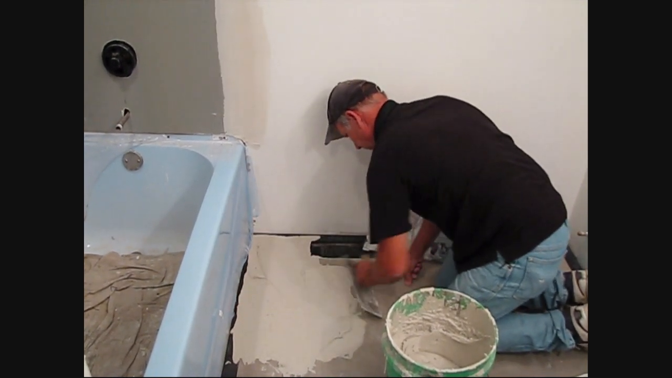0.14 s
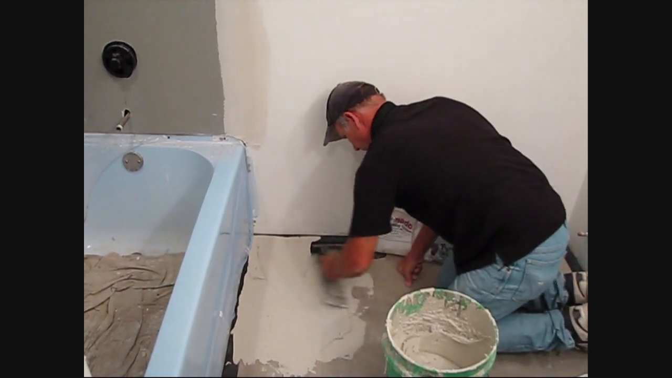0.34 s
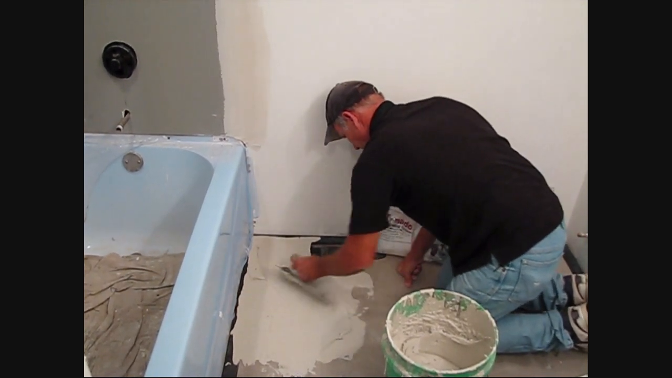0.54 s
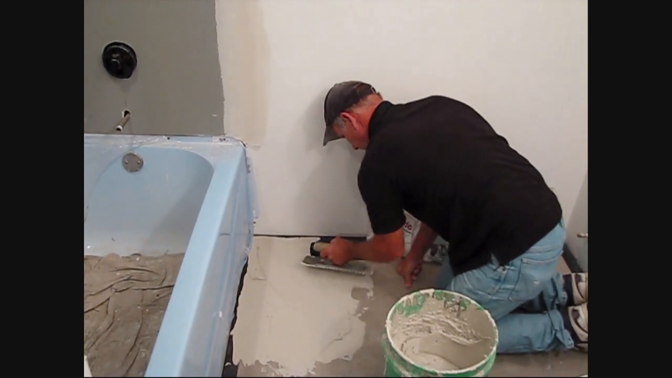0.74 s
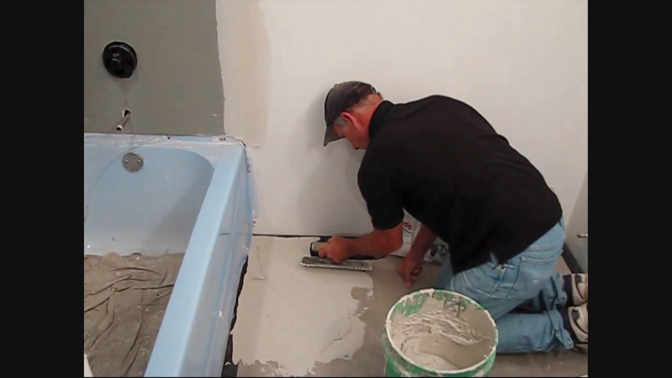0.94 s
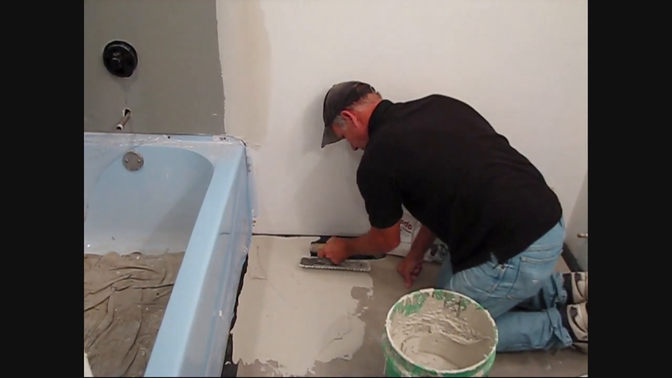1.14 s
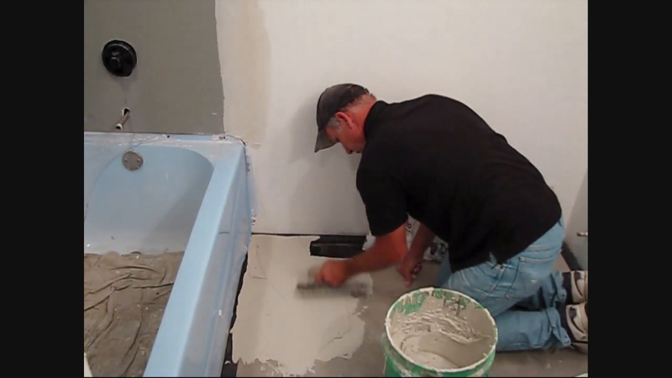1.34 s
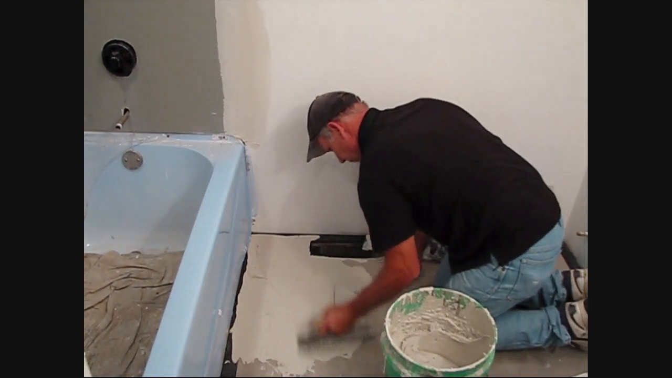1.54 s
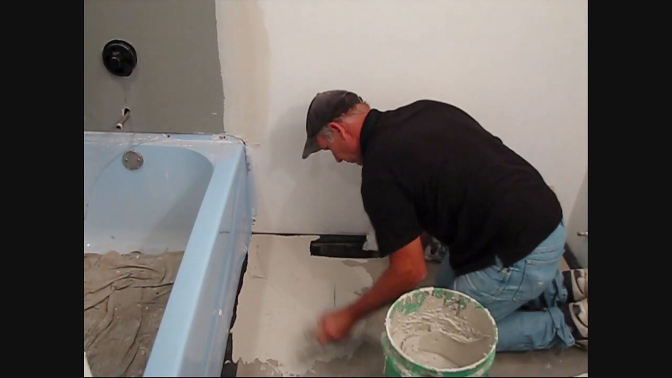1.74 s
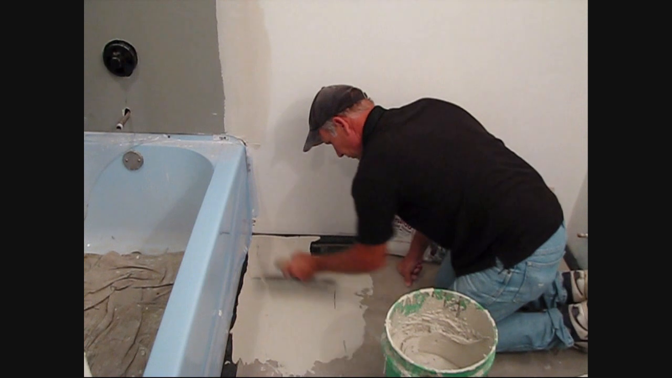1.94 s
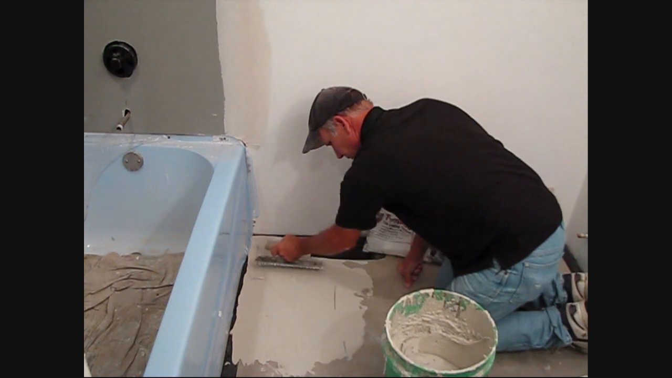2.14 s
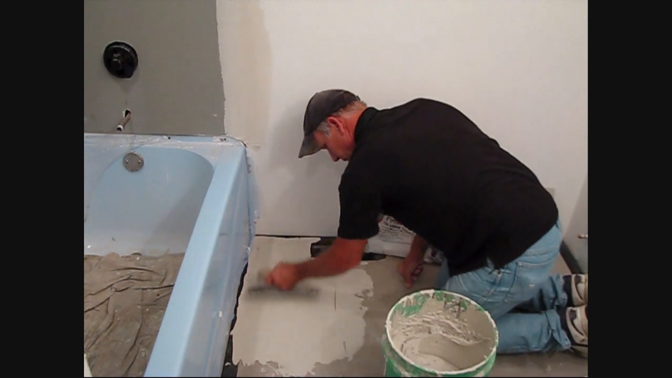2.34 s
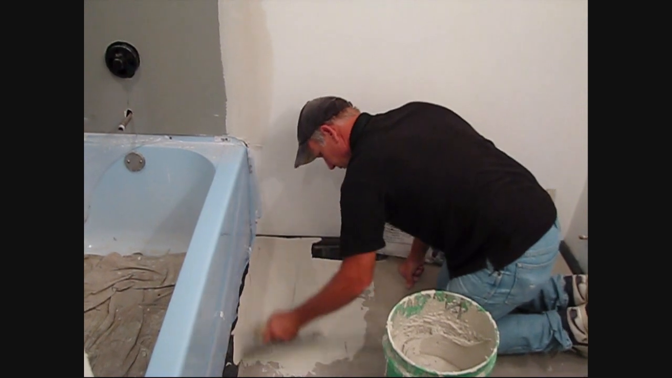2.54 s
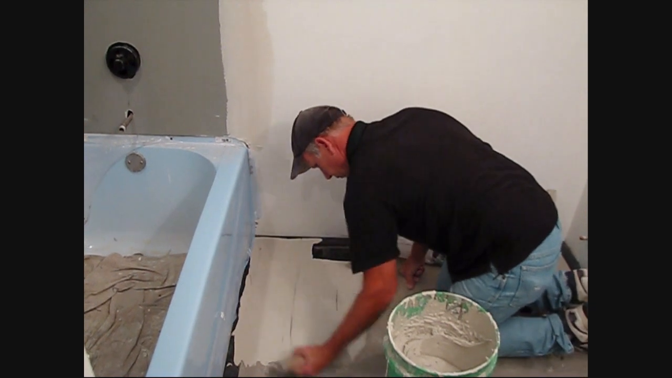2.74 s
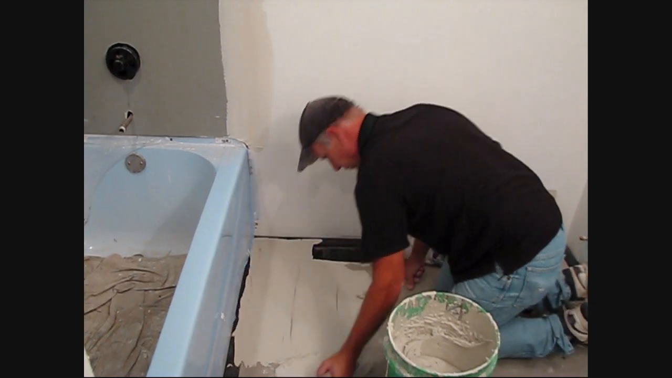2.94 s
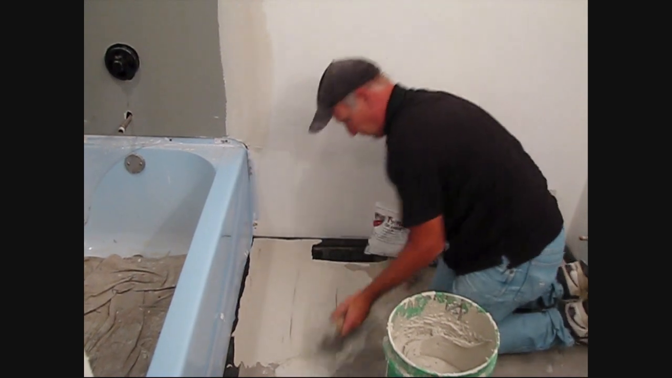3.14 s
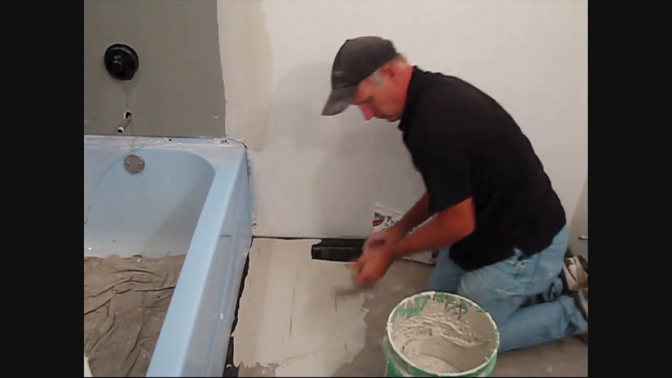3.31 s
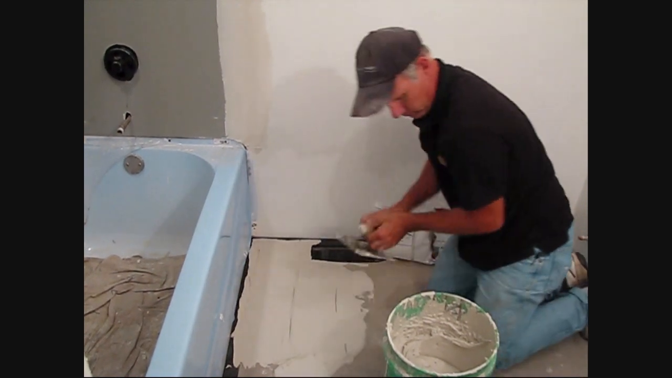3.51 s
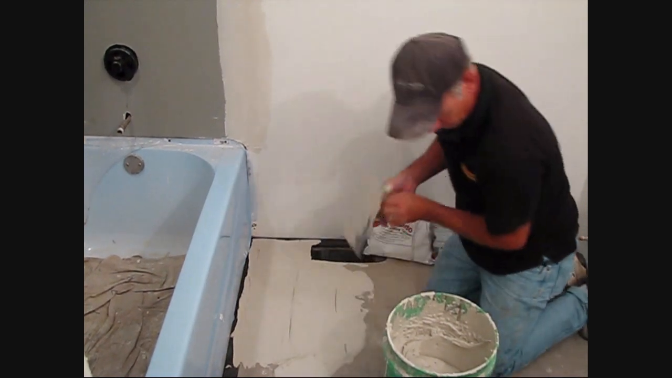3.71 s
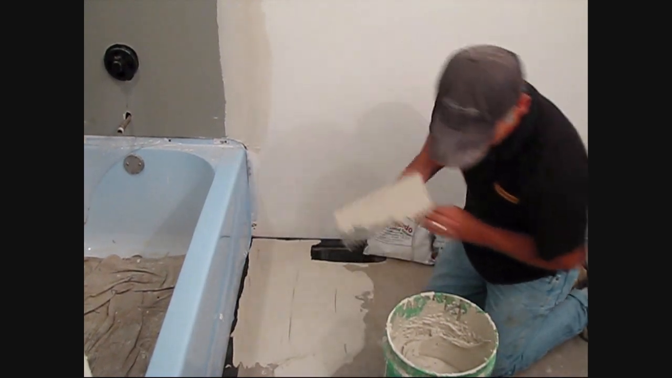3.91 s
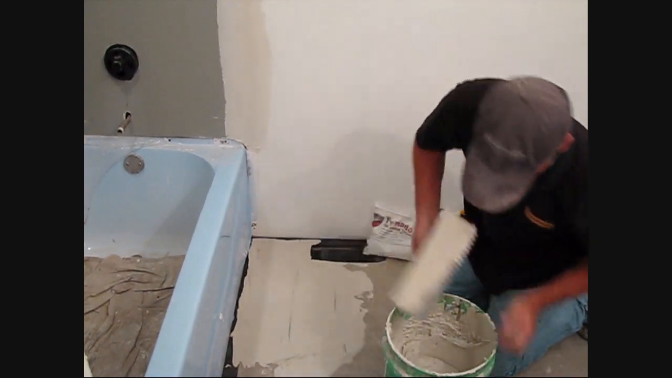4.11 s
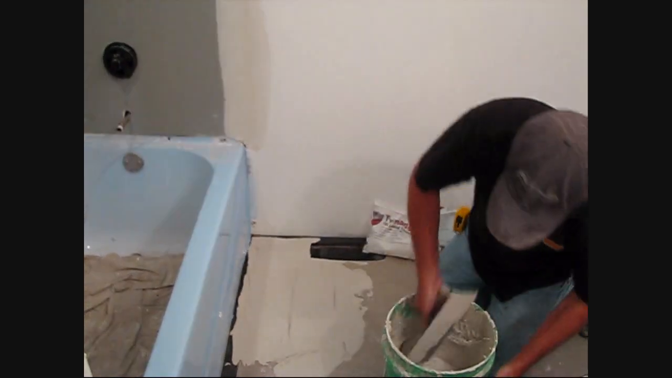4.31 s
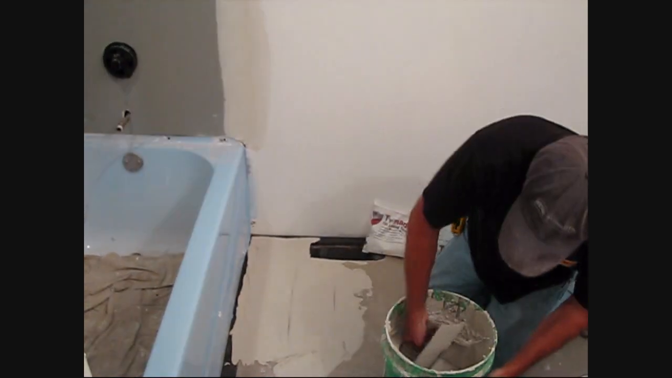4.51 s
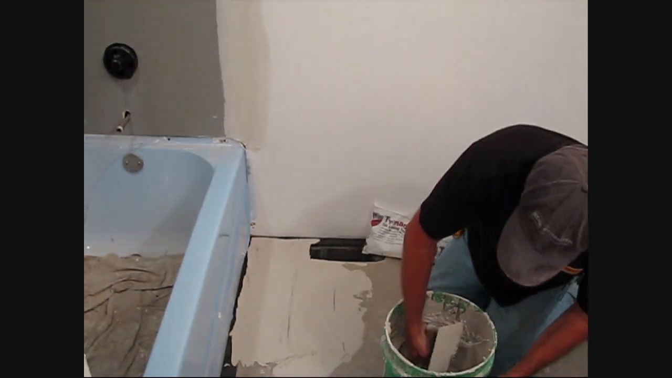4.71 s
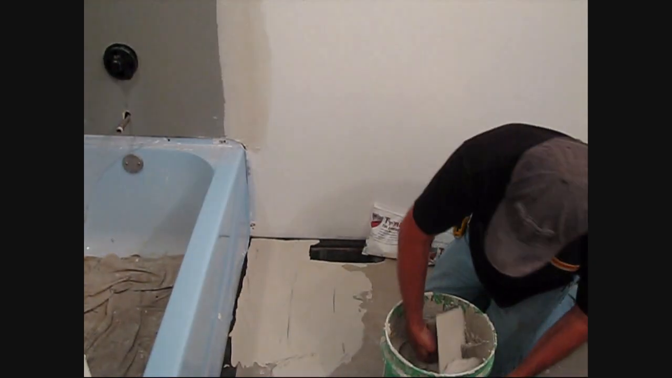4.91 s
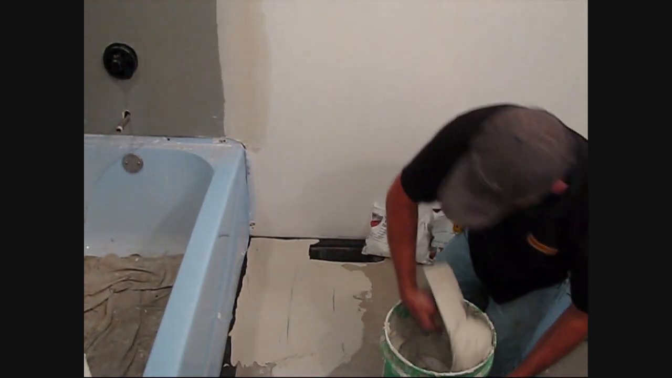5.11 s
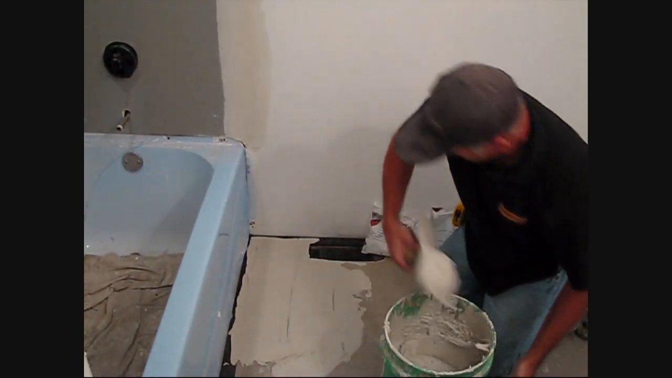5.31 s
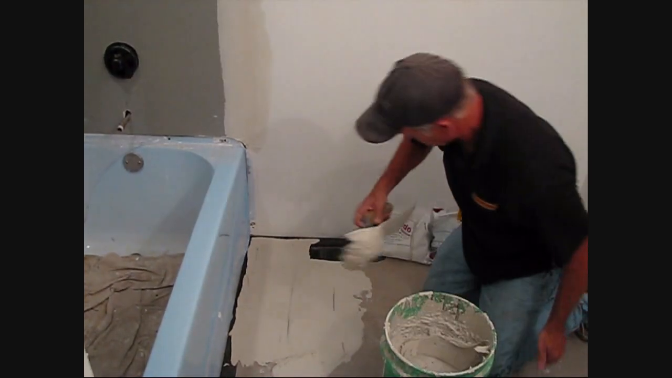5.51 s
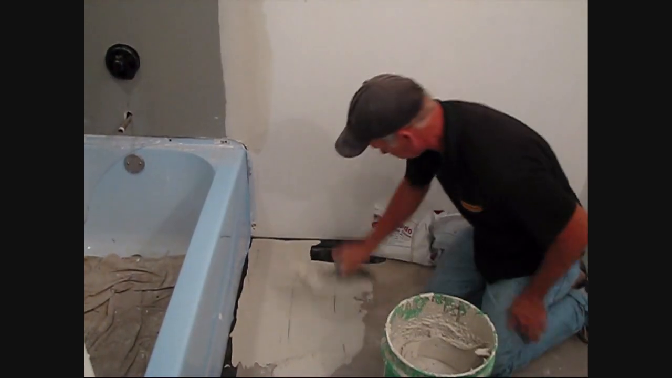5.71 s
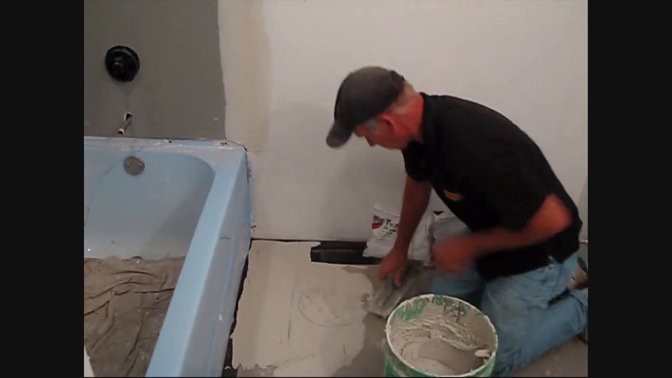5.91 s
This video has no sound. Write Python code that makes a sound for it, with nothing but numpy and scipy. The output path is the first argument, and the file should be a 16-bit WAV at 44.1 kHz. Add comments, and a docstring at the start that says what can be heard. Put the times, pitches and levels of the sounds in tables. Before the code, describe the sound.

A steel trowel scrapes gritty mortar across a floor, scoops in a plastic bucket, then slaps down a wet lump in a bare room.

```python
"""Trowelling mortar on a bathroom floor

A kneeling worker spreads mortar with a steel trowel in four groups of strokes. Sand grains stick and
slip under the blade and excite its modes; its bite, a broad resonance, shifts in pitch as it tilts.
The worker then scoops in a plastic bucket, whose wall drums, and slaps a fresh lump on the floor.
The bare room reverberates for half a second over a low steady noise."""
import sys
import numpy as np
from scipy import signal
from scipy.fft import rfft, irfft
from scipy.io import wavfile
from scipy.ndimage import uniform_filter1d

SR = 44100
rng = np.random.default_rng(int(sys.argv[2]) if len(sys.argv) > 2 else 0)


def transcribe(u):
    """Save the signal u as a 16-bit wav file named by the first command-line argument.

    u: samples, shape (n,) or (channels, n), limited to [-1, 1]; the rate is SR.
    q: integer samples, one column per channel.
    """
    v = np.clip(np.atleast_2d(u).T, -1, 1)
    q = np.round(v * 32767).astype(np.int16)
    wavfile.write(sys.argv[1], SR, q)


N = 267246
T = np.arange(N) / SR

# All levels are relative. Spectrum of the room noise: f/Hz, level/dB
AIR_SPECTRUM = [(15, -21), (25, 3), (84, -8.5), (127, -1.5), (170, -7.5), (256, -0.5), (285, -5.5),
                (326, -1.5), (439, -13.5), (476, -10.5), (1160, -18), (1330, -18), (3250, -23.5),
                (7920, -31), (16000, -36.5)]
# room noise ducked by the recorder's gain after loud strokes, then slowly recovering: t/s, level/dB
DUCKING_GAIN = [(0, -37), (.15, -55), (.9, -45.5), (1.6, -49), (2.15, -44.5), (6.06, -40.5)]
# weight shifting on the knees: t/s, rise/s, hold/s, level/dB
WEIGHT_SHIFTS = [(2.35, .08, .2, -50), (2.8, 0.037, .015, -31.5), (3.122, 0.016, .025, -28),
                 (3.203, 0.047, .16, -37), (3.552, 0.11, 0.32, -51), (4.3, 0.23, .6, -51)]
# reverberation time of the room: f/Hz, T60/s
REVERB_TIMES = [(100, 0.22), (400, 0.54), (1000, 0.5), (2700, 0.43), (7000, 0.4), (15000, 0.28)]
# likeness of left and right in the diffuse field: f/Hz, coherence/1
COHERENCE = [(100, .99), (500, 0.95), (1000, 0.8), (1800, 0.56), (2700, 0.15), (5000, 0.027),
             (15000, 0.014)]

# the trowel is handled, then worked through the bucket:
# t/s, rise/s, hold/s, force/dB, wet drag/dB re force, grit/dB re force
SCOOPS = [(3.476, .012, .09, -58, -15, 12), (3.601, 0.02, 0.011, -39, -12, -1),
          (3.792, 0.011, 0.18, -48.5, -0.5, 3), (4.0, 0.18, 0.13, -53, 5, 2),
          (4.292, 0.019, 0.016, -24, 3.5, -13), (4.339, 0.016, 0.011, -36, -7, 2.5),
          (4.408, 0.05, 0.23, -44, 4, 3.5), (4.524, 0.028, 0.055, -35.5, -21, -7),
          (4.652, 0.0056, 0.16, -36.5, 8, 1.5), (4.84, .04, 0.16, -42.5, 5.5, 1.5),
          (4.979, 0.067, 0.11, -30.5, 4, 1), (5.083, 0.063, .018, -17, -4, 4.5),
          (5.294, 0.05, 0.19, -51.5, -3, 5)]
# spectrum of wet mortar dragged in the bucket: f/Hz, level/dB
BUCKET_DRAG_SPECTRUM = [(70, -21), (160, -16), (250, -2.5), (370, 5.5), (420, -31), (480, 2.5), (570, -19),
                        (720, 0.5), (950, -3.5), (1500, -32.5)]
# spectrum of grit in the bucket: f/Hz, level/dB
BUCKET_GRIT_SPECTRUM = [(1500, -22), (2600, 3.5), (3900, 2), (5200, 1.5), (7000, -3.5), (10000, -5.5),
                        (16000, -13)]
# the trowel shoves the bucket wall: t/s, rise/s, hold/s, level/dB
WALL_SHOVES = [(4.295, 0.087, 0.024, -30), (4.648, 0.014, 0.019, -29), (4.95, 0.13, .025, -31.5),
               (5.114, 0.069, 0.028, -22)]
# modes of the bucket wall: f/Hz, bandwidth/Hz, level/dB
WALL_MODES = [(230, 14, -16), (252, 7.3, -9), (315.2, 5.8, 25), (322, 9.8, -12)]

# spectrum of the splattering lump: f/Hz, level/dB
SPLAT_SPECTRUM = [(100, -5.5), (300, 6), (520, -7.5), (780, -3.5), (1100, -10.5), (1550, -0.5),
                  (2000, -7.5), (2700, -4), (4000, -12), (8000, -14.5), (16000, -28)]
# floor and room modes struck by the lump: f/Hz, bandwidth/Hz, level/dB
THUD_MODES = [(62.6, 6.5, -15), (98.5, 6.5, -22), (219.7, 5.6, -13.5), (260, 26, -6), (327, 3.3, -22),
              (424, 5.1, -27)]
# spectrum of the low shudder as it lands: f/Hz, level/dB
SHUDDER_SPECTRUM = [(15, -7), (60, -1), (110, 5), (160, -22), (300, -37), (800, -73)]

# the steel edge knocks down or catches a stone: t/s, clack/dB, tick/dB
KNOCKS = [(0.019, 0, -32), (0.0366, -29, -32), (0.079, -25, -37), (0.324, -17, -15), (1.046, -35, -28.5),
          (1.074, -25, -19.5), (1.222, -9.5, -16), (1.636, -12, -8.5), (2.646, -28, -25), (2.989, -8, -16),
          (4.658, -33, -19), (5, -26, -15)]
# spectrum of the blade's clack: f/Hz, level/dB
CLACK_SPECTRUM = [(200, -50), (700, -11), (2000, 13), (3100, 9.5), (4500, 3), (8000, -4), (16000, -67)]
# spectrum of the stone's tick: f/Hz, level/dB
TICK_SPECTRUM = [(1500, -11), (4000, 5.5), (8000, -6), (16000, -11)]
# tones of the chattering blade: centre t/s, length/s, f/Hz, level/dB
CHATTER_TONES = [(.035, .04, 2040, -21), (0.04, 0.0455, 2370, -17.5), (.048, .035, 694, -20),
                 (.05, 0.038, 867, -22.5), (.405, 0.093, 1783, -18.5), (.555, .07, 713.5, -28.5),
                 (1.31, .09, 723.4, -19.5), (1.515, .12, 1535, -17), (1.53, 0.15, 1353, -23),
                 (2.342, .05, 1338, -26), (2.395, 0.035, 1125, -21.5), (2.478, 0.26, 1422, -30),
                 (3.005, .055, 1800, -17), (3.044, .07, 1040, -22.5), (3.075, .09, 724, -25),
                 (3.2, 0.068, 1216, -36), (3.255, 0.062, 739, -39.5)]

# pushes of the trowel over the floor: t/s, rise/s, hold/s, force/dB, sag over the hold/dB,
# wet drag/dB re force, grit/dB re force, floor boom/dB re force, bite f/Hz
PUSHES = [(0.01, 0.0064, 0.033, -10, -4.5, -11, -13.5, -44, 2100),
          (0.093, 0.031, 0.013, -25, -5, -1.5, -27, -38, 2060),
          (0.316, 0.0059, 0.053, -20, -2.5, -1, -6.5, -25, 1880),
          (0.358, 0.038, 0.021, -13.5, -7, -12, -11, -20, 2020),
          (0.399, 0.03, 0.013, -28.5, -10, 12, -6, -16, 1900),
          (0.495, 0.039, 0.028, -19.5, -4.5, -0.5, -6, -19, 2040),
          (0.6, .04, 0.21, -53.5, -11, 11.5, -7, 3, 716),
          (1.04, .003, 0.046, -33, -10.5, 2, -12, -5.5, 1190),
          (1.092, .03, 0.1, -41, 4.5, -3, -1, -8.5, 1600),
          (1.214, 0.038, 0.057, -16.5, -3.5, -2.5, -5.5, -14, 2340),
          (1.275, 0.032, 0.028, -18, -7, 1, -15, -13, 820),
          (1.442, 0.034, 0.13, -12.5, -15.5, -6.5, -8.5, -26, 1450),
          (1.624, 0.017, 0.011, -16, -1, -23, -7.5, -27, 1570),
          (1.656, 0.026, 0.1, -24, -19.5, -6, -9, -22, 1240),
          (2.236, .06, 0.023, -42.5, 0, -14, 1.5, -23, 1490),
          (2.318, .009, .04, -28, -3, -11, -8.5, -15, 1270),
          (2.36, 0.022, .012, -20.5, 1.5, -8, -9.5, -19, 1160),
          (2.403, 0.032, 0.14, -24, 1, -14, -10, -18.5, 1340),
          (2.588, 0.048, 0.011, -13.5, -5.5, -6.5, -3.5, -13, 1210),
          (2.69, 0.066, .12, -43, 8, 0, 1.5, -5, 1080), (2.834, 0.033, 0.027, -13, -5, -9, -3, -21.5, 1400),
          (2.97, .014, 0.025, -14.5, -4, -7, -0.5, -19, 1800),
          (3.006, 0.024, .05, -20.5, -16, -1, 1, -12, 960), (3.107, .03, 0.095, -45, -3, -20, -2, -13, 950),
          (3.265, 0.073, 0.076, -43, -7.5, -20, 2, -23, 900),
          (5.752, 0.11, 0.092, -34.5, 2, -0.5, -1, -20, 1520)]
# spectrum of wet mortar dragged over the floor: f/Hz, level/dB
DRAG_SPECTRUM = [(100, -70), (240, -40), (330, -18.5), (430, -32), (500, 0.5), (620, -9.5), (750, 5),
                 (950, -4), (1200, -16.5), (2000, -42.5)]
# spectrum of the scraping steel edge: f/Hz, level/dB
EDGE_SPECTRUM = [(500, -56.5), (850, -1), (1050, 1.5), (1600, 4), (2100, 4.5), (2600, -1), (3100, -4),
                 (4500, -48.5)]
# spectrum of grit on the floor: f/Hz, level/dB
GRIT_SPECTRUM = [(1500, -46), (2600, -11.5), (3300, 0), (5000, -1), (6500, -6.5), (9000, -9.5),
                 (12000, -10.5), (16000, -15)]
# modes of the blade pressed on the floor: f/Hz, bandwidth/Hz, level/dB
BLADE_MODES = [(728, 3.9, 7), (1061, 8.2, 7.5), (1209, 10, 7), (1389, 20, 6.5), (1535, 18, -7),
               (1603, 83, -4), (1800, 59, -16), (2040, 38, -8), (2083, 37, 1), (2328, 22, 5.5),
               (2592, 44, 2)]


def amp(db):
    """Amplitude ratio: tenfold for every 20 dB."""
    return 10 ** (np.asarray(db) / 20)


def unit_rms(x):
    """Normalisation to unit mean power."""
    return x / np.sqrt(np.mean(x ** 2) + 1e-20)


def value_at(points, hz):
    """Interpolation on a logarithmic frequency axis."""
    f, value = np.transpose(points)
    return np.interp(np.log(hz + 1), np.log(f + 1), value)


def colour(x, spectrum, size=4096):
    """Minimum-phase filtering: a causal response of unit energy with the given spectral shape."""
    log_gain = np.log(amp(value_at(spectrum, abs(np.fft.fftfreq(size, 1 / SR)))))
    taps = np.fft.ifft(np.exp(np.conj(signal.hilbert(log_gain)))).real[:size // 2]
    return signal.oaconvolve(x, taps / np.linalg.norm(taps))[:len(x)]


def resonate(x, hz, width_hz):
    """Forced resonance of unit gain, whose natural frequency may vary in time."""
    turn = np.exp(2j * np.pi * np.cumsum(hz * np.ones(len(x))) / SR)
    pole = np.exp(-np.pi * width_hz / SR)
    return 2 * (turn * signal.lfilter([1 - pole], [1, -pole], x / turn + 1e-18)).real


def diffuse(pair):
    """Diffuse-field coherence: two independent signals become alike at low frequencies."""
    coherence = np.clip(value_at(COHERENCE, np.fft.rfftfreq(pair.shape[1], 1 / SR)), -1, 1)
    mid, side = rfft(pair) * np.sqrt([(1 + coherence) / 2, (1 - coherence) / 2])
    return irfft(np.array([mid + side, mid - side]), pair.shape[1])


def pressed(start, rise, hold, db, sag_db, lift_db_per_s=478):
    """Envelope of a contact force: it builds linearly, sags while held and decays on release."""
    age = np.maximum(T - start, 0)
    held = np.clip((age - rise) / hold, 0, 1)
    lifted_s = np.clip(age - rise - hold, 0, 1)
    return np.minimum(age / rise, 1) * amp(db + sag_db * held - lift_db_per_s * lifted_s)


def burst(start, decay_s):
    """Impulsive excitation: exponentially decaying noise of unit energy."""
    out = np.zeros(N)
    part = out[max(int(start * SR), 0):][:SR // 2]
    part += rng.standard_normal(SR // 2)[:len(part)] * np.exp(-T[:len(part)] / decay_s)
    return out / np.linalg.norm(part)


def grains(per_s, size_db, clump_db, clump_hz):
    """Shot noise: sand grains crack in clumps as the steel sticks and slips."""
    clicks = (rng.random(N) < per_s / SR) * rng.choice([-1, 1], N)
    sizes = amp(size_db * np.minimum(rng.exponential(1, N), 4))
    clumps = np.interp(T * clump_hz, np.arange(N), np.clip(rng.standard_normal(N), -2, 2))
    return unit_rms(clicks * sizes * amp(clump_db * clumps))


def background(whine_hz=7890, whine_width_hz=35):
    """Diffuse room noise and a thin whine, ducked by the recorder's gain; a shifting load rumbles."""
    air = np.array([colour(rng.standard_normal(N), AIR_SPECTRUM) for _ in range(2)])
    ducking = amp(np.interp(T, *np.transpose(DUCKING_GAIN)))
    phase_walk = np.cumsum(rng.standard_normal((2, N)), axis=1) * np.sqrt(2 * np.pi * whine_width_hz / SR)
    whine = unit_rms(np.sin(2 * np.pi * whine_hz * T + phase_walk))
    low_band = signal.butter(4, [16, 48], "band", fs=SR, output="sos")
    rumble = unit_rms(signal.sosfilt(low_band, rng.standard_normal(N)))
    load = amp(-65) + sum(pressed(*shift, sag_db=-3) for shift in WEIGHT_SHIFTS)
    return ducking * diffuse(air + amp(-20.5) * whine) + load * rumble


def room(x, first_s, patterns=1, echoes_per_s=6000, switches_per_s=130):
    """Reverberation: each band decays at its own rate; a moving tool cycles through echo patterns."""
    out = np.zeros((2, N))
    for k in range(patterns):
        echoes = rng.standard_normal((2, SR)) * (rng.random((2, SR)) < echoes_per_s / SR)
        hz, t, bands = signal.stft(echoes * (T[:SR] > first_s), SR, nperseg=256)
        decay = amp(-60 * t / value_at(REVERB_TIMES, hz)[:, None])
        tail = signal.istft(bands * decay, SR, nperseg=256)[1]
        tail = diffuse(tail / np.linalg.norm(tail, axis=1, keepdims=True))
        active = np.floor(T * switches_per_s) % patterns == k
        crossfade = np.sqrt(uniform_filter1d(active * 1., size=200).clip(0))
        out += signal.fftconvolve((x * crossfade)[None], tail, axes=1)[:, :N]
    return out


def wipe():
    """Sliding friction: fine sand hisses as mortar is wiped off the raised blade."""
    treble = signal.butter(2, 6700, "high", fs=SR, output="sos")
    hiss = signal.sosfilt(treble, rng.standard_normal(N))
    return pressed(start=3.8, rise=0.0082, hold=0.17, db=-40.5, sag_db=-11) * hiss


def scoop_gains():
    """Incoherent scoops add in power, giving the gains of steel, wet drag and grit."""
    power = np.zeros((3, N))
    for start, rise, hold, db, drag_db, grit_db in SCOOPS:
        force = pressed(start, rise, hold, db, sag_db=-4.5)
        power += (force * amp([[0], [drag_db], [grit_db]])) ** 2
    return np.sqrt(power)


def bucket():
    """Friction in coarse wet mortar, and forced vibration of the shoved plastic wall."""
    force, drag_gain, grit_gain = scoop_gains()
    sand = grains(per_s=2400, size_db=3.5, clump_db=0.5, clump_hz=354)
    paste = grains(per_s=530, size_db=2.5, clump_db=5, clump_hz=119.75)
    drag = drag_gain * amp(-3.5) * colour(paste, BUCKET_DRAG_SPECTRUM)
    edge = force * amp(-0.13) * colour(sand, EDGE_SPECTRUM)
    grit = grit_gain * amp(-1.55) * colour(sand, BUCKET_GRIT_SPECTRUM)
    shove = sum(pressed(*row, sag_db=-9) for row in WALL_SHOVES)
    wall = shove * unit_rms(sum(amp(db) * resonate(paste, hz, width) for hz, width, db in WALL_MODES))
    return drag + edge + grit, wall


def slap(start=5.8538, pulse_s=0.0033, rise_s=0.0024):
    """Inelastic impact: the lump displaces a pulse of air, splatters and excites floor and room modes."""
    age = np.maximum(T - start, 0)
    pulse = (1 - age / pulse_s) * np.exp(-age / pulse_s) * (1 - np.exp(-(age / rise_s) ** 2))
    splashes = [colour(burst(start + 0.00112, decay_s=0.0074), SPLAT_SPECTRUM) for _ in range(2)]
    splat = diffuse(np.array(splashes))
    thud = sum(amp(db) * np.exp(-np.pi * width * age) * np.sin(2 * np.pi * hz * age)
               for hz, width, db in THUD_MODES)
    shudder = colour(burst(start, decay_s=0.056), SHUDDER_SPECTRUM)
    wall_echo = np.interp(T - 0.018, T, pulse)
    crack = colour(signal.unit_impulse(N, int((start + 0.0026) * SR)), SPLAT_SPECTRUM)
    impact = amp(19) * splat + amp(1.5) * pulse + amp(-5) * thud + amp(0.5) * shudder
    return impact + amp(-13) * wall_echo + amp(14.5) * room(crack, first_s=0.0046)


def knocks():
    """Brief hard contacts have broad spectra: a clack of the blade and a tick of stone."""
    clacks = sum(amp(db) * burst(start, decay_s=0.00034) for start, db, _ in KNOCKS)
    ticks = sum(amp(db) * burst(start, decay_s=0.00013) for start, _, db in KNOCKS)
    return amp(13) * colour(clacks, CLACK_SPECTRUM) + amp(9) * colour(ticks, TICK_SPECTRUM)


def chatter():
    """Self-excited vibration: stick and slip lock briefly onto one mode in a rough, wavering tone."""
    out = np.zeros(N)
    for centre, length, hz, db in CHATTER_TONES:
        swell = signal.windows.hann(int(length * SR))
        waver, rough = (unit_rms(uniform_filter1d(rng.standard_normal(SR), size=150))[:len(swell)]
                        for _ in range(2))
        phase = 2 * np.pi * np.cumsum(hz * (1 + 0.023 * waver)) / SR
        first = max(int((centre - length / 2) * SR), 0)
        out[first:first + len(swell)] += amp(db) * swell * np.sin(phase) * (1 + 0.04 * rough)
    return out


def push_curves(tilt_octaves=0.051):
    """Pushes add in power (steel, drag, grit, boom); the bite falls in pitch as the blade flattens."""
    power, weighted_hz = np.zeros((4, N)), np.zeros(N)
    for start, rise, hold, db, sag_db, drag_db, grit_db, boom_db, hz in PUSHES:
        force = pressed(start, rise, hold, db, sag_db)
        tilt = np.clip((T - start) / (rise + hold), 0, 1) - 0.5
        power += (force * amp([[0], [drag_db], [grit_db], [boom_db]])) ** 2
        weighted_hz += force ** 2 * hz * 2 ** (-tilt_octaves * tilt)
    bite_hz = np.maximum(weighted_hz / (power[0] + 1e-30), BLADE_MODES[0][0])
    return *np.sqrt(power), bite_hz


def trowel(floor_hz=330, floor_width_hz=47, bite_width_hz=1100):
    """Source and filter: grain friction drives the scrape, the floor, the bite and the blade's modes."""
    force, drag_gain, grit_gain, boom_gain, bite_hz = push_curves()
    sand = grains(per_s=5000, size_db=4, clump_db=4, clump_hz=303.3)
    paste = grains(per_s=2500, size_db=3, clump_db=2.5, clump_hz=151.7)
    slips = grains(per_s=4400, size_db=3, clump_db=4.5, clump_hz=254.6)
    drag = drag_gain * amp(-4) * colour(paste, DRAG_SPECTRUM)
    floor = resonate(paste, floor_hz, floor_width_hz)
    boom = boom_gain * unit_rms(resonate(floor, floor_hz, 2 * floor_width_hz))
    edge = force * colour(sand, EDGE_SPECTRUM)
    bite = force * unit_rms(resonate(resonate(slips, bite_hz, bite_width_hz), bite_hz, bite_width_hz))
    grit = grit_gain * colour(sand, GRIT_SPECTRUM)
    # each mode of the blade flares as the bite passes it
    ring = sum(amp(db) * resonate(bite + amp(2) * drag, hz, width) for hz, width, db in BLADE_MODES)
    scrape = drag + boom + amp(-4) * edge + amp(-3.5) * bite + amp(-0.24) * grit
    return scrape, amp(-0.5) * ring


def scene():
    """Superposition: the direct sound of the work, its reverberation and the background."""
    scrape, ring = trowel()
    scoop, wall = bucket()
    rubbing = scrape + scoop + wipe()
    taps, squeal = knocks(), chatter()
    direct = amp(-8.5) * rubbing + amp(-5) * ring + amp(-6) * taps + amp(1.5) * (squeal + wall)
    scrape_echo = room(amp(-1) * rubbing + amp(4) * taps, first_s=0.001, patterns=4)
    ring_echo = room(amp(-3) * ring + amp(-1.5) * squeal + amp(-13) * wall, first_s=0.0049, patterns=2)
    balance = amp([[-0.25], [0.25]])
    return (direct + scrape_echo + ring_echo + slap() + background()) * balance


def record(dry, cutoff_hz=16150):
    """Saturation and band limiting: peaks clip at full scale, then a low-pass filter acts."""
    low_pass = signal.firwin(511, cutoff_hz, window=("kaiser", 9), fs=SR)
    return signal.oaconvolve(np.clip(dry, -1, 1), low_pass[None], "same")


dry = scene()
out = record(dry)
transcribe(out)
```